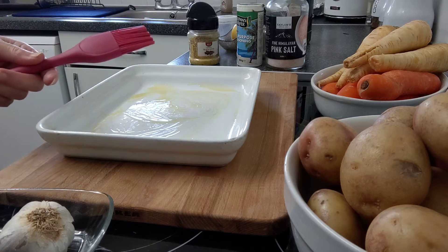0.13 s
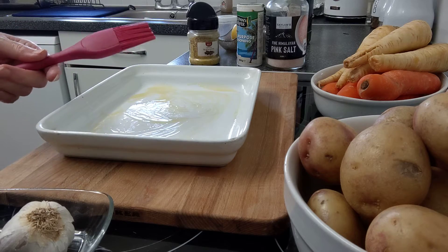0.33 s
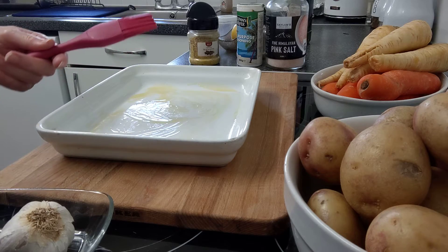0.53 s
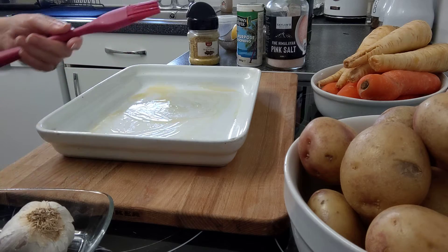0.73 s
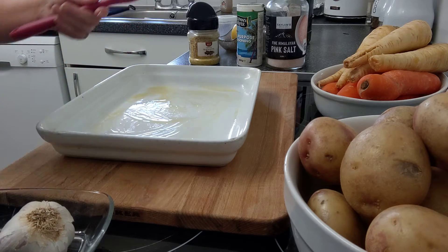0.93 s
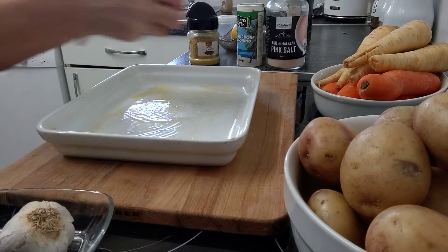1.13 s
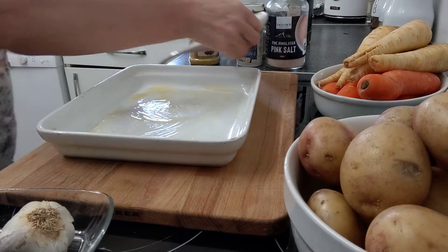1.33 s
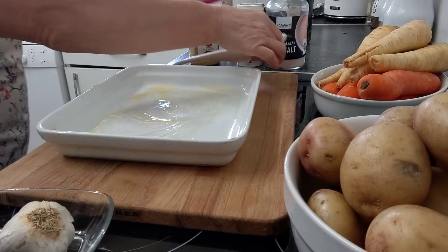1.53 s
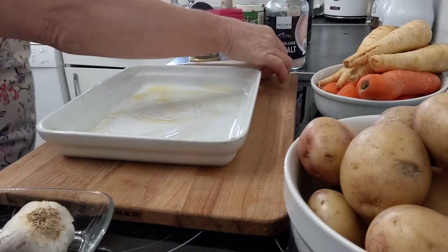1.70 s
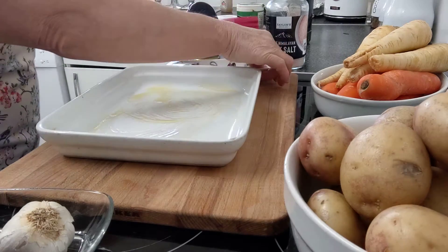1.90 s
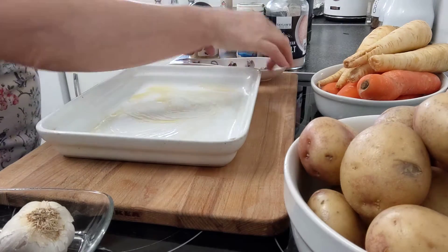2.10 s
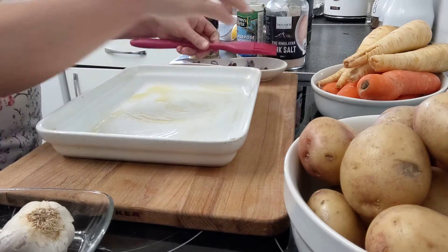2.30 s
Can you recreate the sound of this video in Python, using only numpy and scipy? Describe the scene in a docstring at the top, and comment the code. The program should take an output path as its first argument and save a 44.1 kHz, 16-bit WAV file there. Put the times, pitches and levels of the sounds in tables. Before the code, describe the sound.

A small plate clatters as it is picked up, then is set down on wood.

```python
"""Light scuffs and ticks come first, over an appliance's hum and a faint hiss. Crockery knocks on a
kitchen worktop as a small plate is picked up, and a thin rustle follows. The plate taps a wooden board
and is set down flat; soft bumps follow as a silicone brush is laid on it. Each hard contact is a clack
of noise plus the ringing modes of dish and surface, and the small hard room answers every knock."""
import sys
import numpy as np
from scipy import signal
from scipy.fft import rfft, irfft, next_fast_len
from scipy.io import wavfile
from scipy.ndimage import uniform_filter1d, map_coordinates

SR = 44100
rng = np.random.default_rng(int(sys.argv[2]) if len(sys.argv) > 2 else 0)


def dump_mix(stems):
    """Bounce the given channels to the path in sys.argv[1] as a 16-bit WAV at rate SR."""
    frames = np.atleast_2d(stems).T  # one column per channel
    limited = np.clip(frames, -1, 1)  # hard clip at full scale
    pcm = np.round(limited * 32767).astype(np.int16)
    wavfile.write(sys.argv[1], SR, pcm)


N = 103635
HIT, FFT = SR * 3 // 5, 65536  # samples in one hit and in its filter
SCENE_TIME, HIT_TIME = np.arange(N) / SR, np.arange(HIT) / SR
ATTACK_S = 0.0004


def amp(db):
    """Decibels to gain."""
    return 10 ** (np.asarray(db) / 20)


def unit(x):
    """Scaled to rms 1."""
    return x / np.sqrt(np.mean(x ** 2) + 1e-20)


def along(points, hz):
    """A (freq_hz, value) curve read on a log axis."""
    freqs, values = np.transpose(points)
    return np.interp(np.log(hz + 1), np.log(freqs + 1), values)


def wobble(rate_hz):
    """A smooth random curve for modulation."""
    return map_coordinates(rng.standard_normal(N // 100), [np.arange(N) * rate_hz / SR], mode="mirror")


def sides(pan_db):
    """Left and right gains; positive pans left."""
    return amp(np.array([[.5], [-.5]]) * pan_db)


def add(out, start_s, x):
    """Mix x into out from start_s."""
    i = max(0, round(start_s * SR))
    out[:, i:i + x.shape[1]] += x[:, :N - i]


def noise(likeness, size, colour=((1, 0), (2, 0))):
    """Stereo noise of rms 1 with a given left-right likeness and colour."""
    padded = next_fast_len(size)
    hz = np.fft.rfftfreq(padded, 1 / SR)
    width = np.arccos(np.clip(along(likeness, hz), -1, 1)) / 2
    white = rfft(rng.standard_normal((2, padded)))
    mid, side = irfft(white * [np.cos(width), np.sin(width)] * amp(along(colour, hz)), padded)[:, :size]
    return unit(np.array([mid + side, mid - side]))


def eq(x, gain):
    """Minimum-phase EQ by gain(hz), so nothing sounds ahead of the attack."""
    cepstrum = irfft(np.log(np.maximum(gain(np.fft.rfftfreq(FFT, 1 / SR)), 1e-6)))
    cepstrum[..., 1:FFT // 2] *= 2
    cepstrum[..., FFT // 2 + 1:] = 0
    return irfft(rfft(x, FFT) * np.exp(rfft(cepstrum)))[..., :HIT]


def tinted(x, colour, smooth_bins):
    """Flatten a burst's spectrum, then colour it."""
    power = np.abs(uniform_filter1d(np.abs(rfft(x, FFT)) ** 2, smooth_bins)) + 1e-12
    return eq(x, lambda hz: amp(along(colour, hz)) / np.sqrt(power))


# motor tones: pitch_hz, level_db
MOTOR_TONES = [(99, -57.5), (135, -68), (274, -71.5), (303, -68), (505.5, -67.5), (538.5, -64), (572, -66),
               (640, -68)]
# tone of the moving air: freq_hz, gain_db
AIR_COLOUR = [(20, -6), (35, -14), (70, -5), (100, -8.5), (160, -8), (220, -20.5), (400, -13), (540, -13),
              (640, -21.5), (720, -18), (930, -19.5), (1100, -26), (2500, -30), (4900, -37), (7500, -41.5),
              (16000, -42)]
# stereo image of the air: freq_hz, likeness
AIR_LIKENESS = [(60, 0.95), (180, 0.81), (550, -0.08), (1650, -0.0019), (4970, -0.075), (15000, 0.028)]

def appliance():
    """A steady rush of air under motor tones that waver in phase and level."""
    hum = 0
    for hz, db in MOTOR_TONES:
        phase = 2 * np.pi * hz * SCENE_TIME + 0.83 * wobble(5.81)
        hum += amp(db) * unit(np.sin(phase) * amp(3.4 * wobble(7.38)))
    air = amp(-52.5) * noise(AIR_LIKENESS, N, AIR_COLOUR)
    return (hum + air) * sides(pan_db=2.0)


# tone of the hiss: freq_hz, gain_db
HISS_COLOUR = [(1500, 0.5), (2600, 3.5), (4900, 1.5), (7500, -7.5), (11000, -4), (16000, -15.5)]
# its fader: time_s, level_db
HISS_FADER = [(0, -62.5), (1.15, -61), (1.6, -59.5), (2.0, -83)]

def hiss():
    """A faint hiss that sinks towards the end."""
    return amp(np.interp(SCENE_TIME, *np.transpose(HISS_FADER))) * noise(AIR_LIKENESS, N, HISS_COLOUR)


# stereo image of a dry contact: freq_hz, likeness
CONTACT_LIKENESS = [(150, 1), (400, 0.45), (1000, 0.71), (4000, 0.0094), (12000, 0.074)]

def burst(colour, t60_s):
    """Dying noise: many close, heavily damped resonances struck at once."""
    envelope = amp(-60 * HIT_TIME / t60_s) * (1 - np.exp(-HIT_TIME / ATTACK_S))
    return tinted(noise(CONTACT_LIKENESS, HIT) * envelope, colour, smooth_bins=240)


# tick cues: start_s, level_db
TICK_CUES = [(0.015, -13), (0.0893, -2.5), (0.145, -5)]
# their bright tone: freq_hz, gain_db
TICK_COLOUR = [(200, -22), (2000, -16), (5000, -19.5), (12000, -16), (16000, -21)]
# where the worktop sits: freq_hz, pan_db
WORKTOP_PAN = [(150, 2), (1000, -0.5), (5000, -0.5), (9000, -2.5), (14000, -9)]

def ticks():
    """The dish's foot catches as it slides."""
    out = np.zeros((2, N))
    for start_s, db in TICK_CUES:
        tick = burst(TICK_COLOUR, t60_s=0.043)
        add(out, start_s, amp(db) * eq(tick, lambda hz: sides(along(WORKTOP_PAN, hz))))
    return out


# scuff cues: start_s, level_db, decay_s
SCUFF_CUES = [(0.016, -44, 0.026), (0.054, -42.5, 0.018), (0.088, -50, 0.03), (0.145, -52.5, 0.079)]
# tone of the rub: freq_hz, gain_db
SCUFF_COLOUR = [(60, 18.5), (170, 4), (380, 14.5), (700, 2.5), (1500, -1), (2500, -5), (5000, -3.5),
                (7500, -10), (12000, -9), (16000, -19)]

def scuffs():
    """The plate is handled: grainy rubs that start quickly and fade."""
    out = np.zeros((2, N))
    for start_s, db, decay_s in SCUFF_CUES:
        grain = noise(CONTACT_LIKENESS, HIT, SCUFF_COLOUR) * amp(3.4 * wobble(290)[:HIT])
        envelope = np.exp(-HIT_TIME / decay_s) * (1 - np.exp(-HIT_TIME / 0.0017))
        rub = eq(grain * envelope, lambda hz: sides(along(WORKTOP_PAN, hz)))
        add(out, start_s, amp(db) * kitchen(rub, room_db=4.5))
    return out


# reverb time: freq_hz, t60_s
ROOM_DECAY = [(100, 0.52), (300, 0.22), (1000, 0.29), (3000, 0.35), (6000, 0.34), (14000, 0.17)]
# reverb tone: freq_hz, gain_db
ROOM_COLOUR = [(100, -17.5), (300, -1), (1000, 0), (3000, 0.5), (12000, 0)]
# reverb image: freq_hz, likeness (clipped at -1)
ROOM_LIKENESS = [(120, 1), (300, 0.82), (800, 0.31), (10000, -1.38)]

def kitchen(x, room_db):
    """A sound plus the small hard room's answer, each band dying at its own speed."""
    hz, t, bands = signal.stft(noise(ROOM_LIKENESS, HIT), SR, nperseg=256)
    decay = amp(-60 * t / along(ROOM_DECAY, hz)[:, None])
    tail = signal.istft(bands * decay, SR, nperseg=256)[1][:, :HIT]
    build_up = 1 - np.exp(-(HIT_TIME / 0.0045) ** 2)
    tail = tinted(tail * build_up, ROOM_COLOUR, smooth_bins=70)
    return x + amp(room_db) * signal.fftconvolve(x, tail, axes=1)[:, :x.shape[1]]


def ring(modes, spread_db=1, width_rad=0.72):
    """Struck modes die away; all but the lowest differ in phase from left to right."""
    out = np.zeros((2, HIT))
    for (hz, db, t60_s), (level, start, lean) in zip(modes, rng.standard_normal((len(modes), 3))):
        offset = np.sign(lean) * width_rad * hz ** 2 / (hz ** 2 + 230 ** 2)
        phase = np.pi * start + np.array([[offset], [-offset]])
        envelope = amp(db + spread_db * level - 60 * HIT_TIME / t60_s)
        out += envelope * np.sin(2 * np.pi * hz * HIT_TIME + phase)
    return out * (1 - np.exp(-HIT_TIME / ATTACK_S))


def overtones(count=36, low_hz=5570, high_hz=14570, level_db=-26, t60_s=0.091):
    """A dish's many faint upper modes, scattered through the treble."""
    jitter, levels = rng.random(count), rng.standard_normal(count)
    pitches = low_hz + (high_hz - low_hz) * (np.arange(count) + jitter) / count
    return [(hz, level_db + 3 * level, t60_s) for hz, level in zip(pitches, levels)]


def ripple(depth_db=2, step_hz=90, from_hz=5700):
    """Close overlapping resonances put narrow peaks and dips in a dish's treble."""
    draws = rng.standard_normal(400)
    hz = np.arange(len(draws)) * step_hz
    return np.transpose([hz, depth_db * draws * hz ** 2 / (hz ** 2 + from_hz ** 2)])


def struck_at(modes, spot):
    """The modes as a blow at one spot excites them: pitch_hz, level_db, t60_s."""
    return [(hz, levels[spot], t60_s) for hz, *levels, t60_s in modes]


def dish_hits(cues, dish, surface, clack_colour, pan, clack_db, clack_t60_s, spots=None):
    """Each contact clacks and rings both dish and surface; a softer one loses its treble."""
    out = np.zeros((2, N))
    shimmer, peaks = ring(overtones()), ripple()
    for cue, spot in zip(cues, spots or [0] * len(cues)):
        start_s, db, cutoff_hz, thud_db, ring_db, room_db, pan_db = cue
        modes = struck_at(dish, spot)
        strongest_db = max(level for _, level, _ in modes)
        clack = amp(clack_db) * burst(clack_colour, clack_t60_s)
        thud = amp(thud_db) * ring(struck_at(surface, spot))
        chime = amp(ring_db) * (ring(modes) + amp(strongest_db) * shimmer)
        hit = kitchen(clack, room_db) + kitchen(thud + chime, room_db - 6)

        def tone(hz):
            low_pass = 1 / np.sqrt(1 + (hz / cutoff_hz) ** 4)
            return sides(pan_db + along(pan, hz)) * amp(along(peaks, hz)) * low_pass

        add(out, start_s, amp(db) * eq(hit, tone))
    return out


# knock cues: start_s, level_db, cutoff_hz, thud_db, ring_db, room_db, pan_db
KNOCK_CUES = [(.2065, -13, 1730, -1.5, -2, 4, -2.5), (.2414, -3, 6460, 3.5, 3, -0.5, 0.5),
              (.3052, 2.5, 10300, -2.5, -1, -0.5, 1.5), (.3451, -2, 9100, -3, 2.5, 0.5, 1.5)]
# where each knock lands: spot_index
KNOCK_SPOTS = [0, 0, 1, 2]
# high ring of the crockery, thud of the worktop: pitch_hz, spot0_db, spot1_db, spot2_db, t60_s
CROCKERY_MODES = [(1348, -41, -44, -34, .15), (1590, -47, -45, -39, .16), (2030, -31, -25, -41, .13),
                  (2285, -27, -20, -38, .06), (2447, -40, -36, -37, .18), (2850, -35, -23, -30, .07),
                  (3055, -42, -27, -34, .07), (3320, -40, -30, -36, .14), (3735, -31, -32, -36, .14),
                  (3860, -42, -28, -26, .06), (4020, -41, -23, -21, .04), (4835, -42, -22, -30, .08),
                  (5010, -41, -32, -28, .08), (5260, -52, -39, -32, .09), (6050, -37, -28, -42, .07),
                  (7700, -48, -40, -40, .06)]
WORKTOP_MODES = [(99, -36, -46, -48, .24), (175, -43, -28, -37, .08), (217, -38, -23, -31, .1),
                 (249, -45, -41, -43, .62), (273, -25, -42, -40, .1), (296, -38, -34, -32, .18),
                 (347, -37, -28, -38, .14), (400, -25, -31, -43, .11), (577, -29, -28, -42, .13),
                 (775, -25, -43, -43, .075), (885, -35, -27, -39, .08), (1005, -29, -19, -37, .075)]
# the worktop's hard clack: freq_hz, gain_db
WORKTOP_CLACK = [(50, -61), (110, -14), (230, 2), (500, -2.5), (700, -2), (1000, 3), (1750, 1), (2200, 9),
                 (3100, 4), (3550, 4), (3900, 8), (5100, 1), (6700, -1.5), (9000, -2.5), (13000, -1.5),
                 (16000, -19)]

def worktop_knocks():
    """Crockery knocks on the worktop as the plate is picked up."""
    return dish_hits(KNOCK_CUES, CROCKERY_MODES, WORKTOP_MODES, WORKTOP_CLACK, WORKTOP_PAN,
                     clack_db=3.5, clack_t60_s=0.046, spots=KNOCK_SPOTS)


# bump cues: start_s, level_db
BUMP_CUES = [(.326, 7), (0.354, 5), (2.027, -20), (2.136, -1.5), (2.21, -5), (2.241, -11.5)]
# their dull tone: freq_hz, gain_db
BUMP_COLOUR = [(40, -19.5), (150, 10), (300, 3), (600, -9), (1200, -19), (3000, -52), (12000, -52)]

def soft_bumps():
    """The settling dish, the silicone brush and the hand thud with no ring."""
    out = np.zeros((2, N))
    for start_s, db in BUMP_CUES:
        add(out, start_s, amp(db) * kitchen(burst(BUMP_COLOUR, t60_s=0.03), room_db=-0.5))
    return out


# the rustle's fader: time_s, level_db
RUSTLE_FADER = [(.52, -95), (.58, -64.5), (.71, -62.5), (.79, -93)]
# its airy tone: freq_hz, gain_db
RUSTLE_COLOUR = [(2000, -19), (7000, -5), (11000, 0), (16000, -2)]

def rustle():
    """A thin, high rustle swells and fades on the right."""
    swell = amp(np.interp(SCENE_TIME, *np.transpose(RUSTLE_FADER)))
    return swell * sides(pan_db=-9) * noise(AIR_LIKENESS, N, RUSTLE_COLOUR)


# tap cues: start_s, level_db, cutoff_hz, thud_db, ring_db, room_db, pan_db
TAP_CUES = [(1.4992, -4, 3200, -13, -5, -3, 1), (1.5955, -1, 4640, -18.5, -4, -4, 0.85),
            (1.632, -12.5, 5030, -6, -1.5, 2.5, 0.46)]
# ring of the small plate, thud of the board: pitch_hz, level_db, t60_s
PLATE_MODES = [(862, -39, 0.32), (1015, -44, 0.36), (1388, -35, 0.055), (1490, -34, .055),
               (1650, -34, 0.11), (2070, -43, 0.32), (2444, -33, 0.23), (2802, -33, 0.06),
               (3362, -35.5, 0.22), (3735, -38, 0.12), (4820, -50, 0.22)]
BOARD_MODES = [(170, -27, .1), (285, -31, .11), (350, -30, .14), (619, -29, .13), (735, -30, .14),
               (834, -27, .11), (920, -21, .08), (1140, -20.5, .075), (1212, -22, .085), (1815, -19, .06),
               (1946, -22, .07), (2034, -29, .11)]
# clack of rim on wood: freq_hz, gain_db
RIM_CLACK = [(60, -30), (110, 3), (170, 16), (230, 8), (330, 10.5), (600, -0.5), (850, -0.5), (1200, 3),
             (1500, 14.5), (1900, -4.5), (2600, 6.5), (3150, -2), (3800, 1), (4400, -5.5), (5000, -4.5),
             (6500, -17), (11000, -29), (16000, -16)]
# where the board sits: freq_hz, pan_db
BOARD_PAN = [(150, 0.45), (1000, 1.1), (2500, -1.2), (6000, 2.4)]

def rim_taps():
    """The plate's rim taps the wooden board."""
    return dish_hits(TAP_CUES, PLATE_MODES, BOARD_MODES, RIM_CLACK, BOARD_PAN,
                     clack_db=2, clack_t60_s=0.059)


# set-down cue: start_s, level_db, cutoff_hz, thud_db, ring_db, room_db, pan_db
SET_DOWN_CUE = [(1.7927, 0.0054, 4630, 0.012, 2.4, -1.36, 0.69)]
# fuller clack of foot on wood: freq_hz, gain_db
FOOT_CLACK = [(50, -12), (85, 15.5), (180, -7.5), (500, 13), (900, 15), (1500, 12), (2400, 8.5),
              (3100, 1.5), (3600, 5.5), (4400, -8), (5000, -4), (6500, -13.5), (11000, -10), (16000, -20)]

def set_down():
    """The plate's foot comes down flat on the board."""
    return dish_hits(SET_DOWN_CUE, PLATE_MODES, BOARD_MODES, FOOT_CLACK, BOARD_PAN,
                     clack_db=1, clack_t60_s=0.089)


def scene():
    """The stereo mix of all layers."""
    dishes = worktop_knocks() + rim_taps() + set_down()
    return dishes + scuffs() + soft_bumps() + appliance() + hiss() + ticks() + rustle()


def record(dry):
    """A brick-wall high cut on the mix."""
    padded, top_hz = next_fast_len(N + SR // 2), 16300
    passband = np.fft.rfftfreq(padded, 1 / SR) < top_hz
    return irfft(rfft(dry, padded) * passband, padded)[:, :N]


dry = scene()
out = record(dry)
dump_mix(out)
```